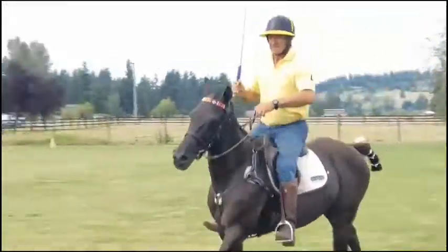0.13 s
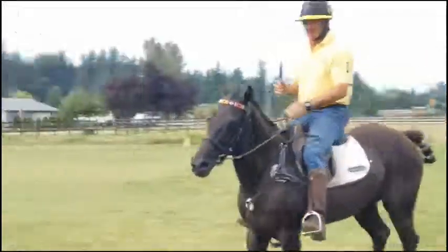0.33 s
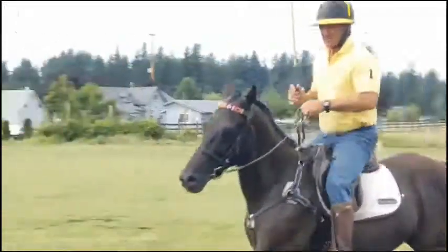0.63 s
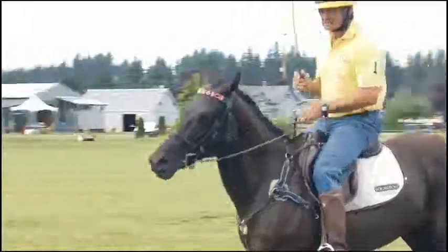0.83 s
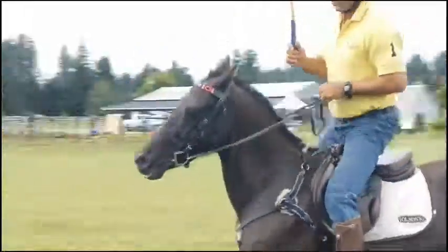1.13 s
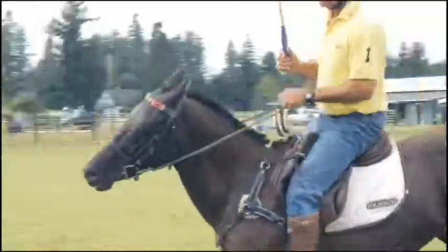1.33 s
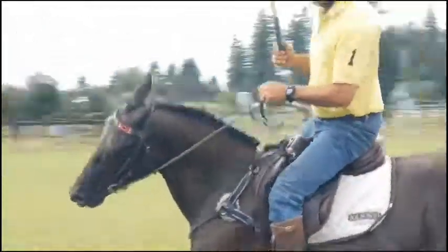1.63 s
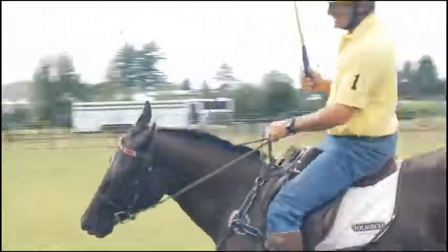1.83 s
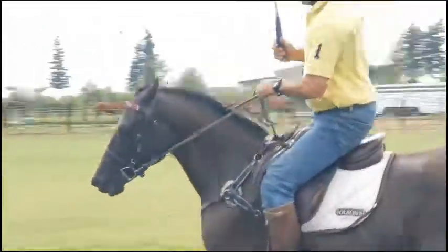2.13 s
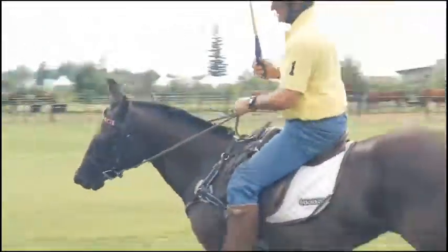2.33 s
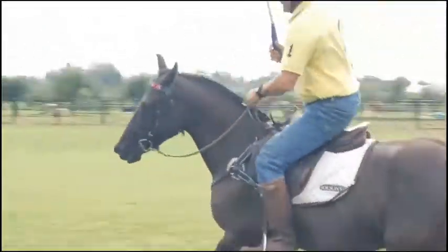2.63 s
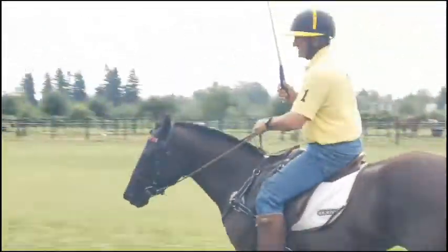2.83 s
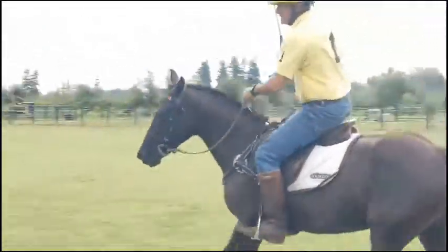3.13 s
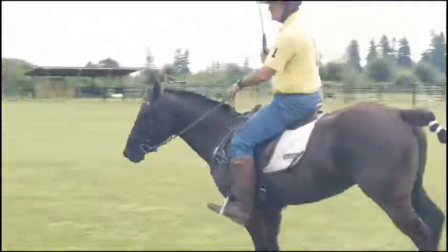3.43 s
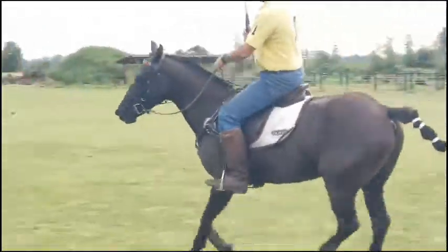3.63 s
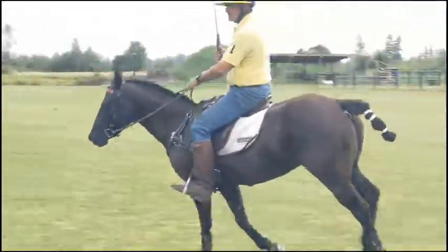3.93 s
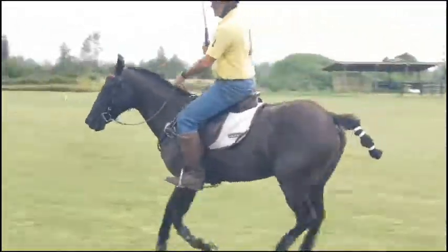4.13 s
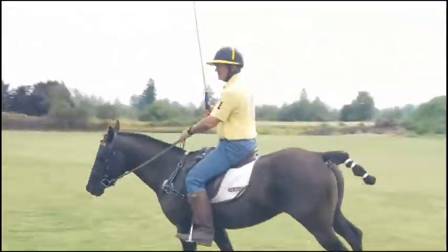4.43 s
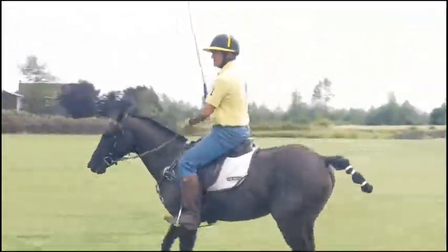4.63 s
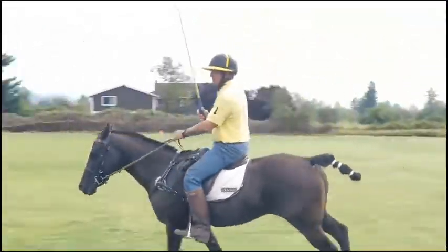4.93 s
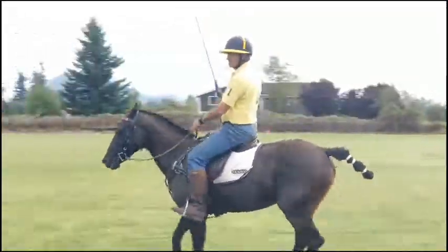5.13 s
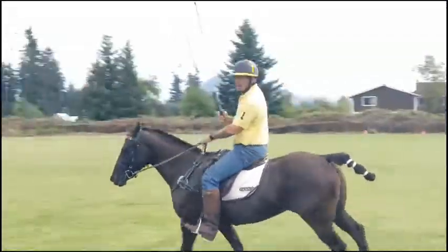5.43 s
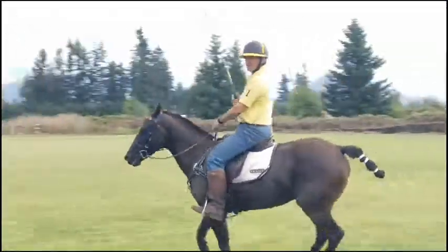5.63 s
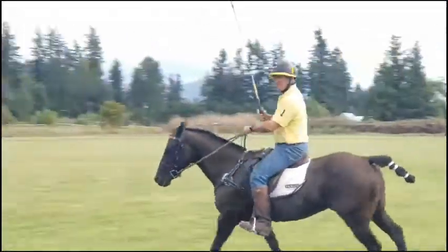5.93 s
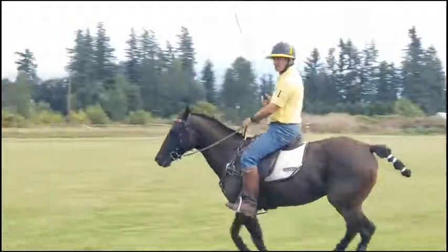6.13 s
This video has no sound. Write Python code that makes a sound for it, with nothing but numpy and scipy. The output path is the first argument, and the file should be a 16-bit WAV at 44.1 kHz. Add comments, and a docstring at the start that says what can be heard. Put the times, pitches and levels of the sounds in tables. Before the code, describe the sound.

In an open grass field, a horse canters past a wind-exposed stereo microphone. From 0 s, soft brushing strokes with dull turf thuds come in quick clusters, one stride about every half second, each with a short, hollow, fluttering nostril blow. The strides are clearest around 0.6-2.3 s. Low wind pops hit the right side from 0.5 s, with a big thump near 1.3 s and smaller buffets on the left until 2.2 s. A tiny bird chirp comes at 1.9 s. From 2.7 to 3.45 s a strong gust pounds the left, with dense booming, slightly saturated knocks. Then it falls away: strides and snorts are weaker and more distant, with crisp ticks near 3.7 and 4.2 s. Smooth far traffic and a faint engine drone drift from left to right. Faint thin whistles come at 5.6-6.05 s as light left-side buffets return until the end at about 6.3 s.

```python
"""Breeze rumbles on a two-port microphone in a grass field as a pony canters past: filtered noise bursts brush
the turf, short noise snaps tick from stalks and tack, and ringing noise makes its blow once a stride.
Wind buffets each port separately, as shaped random kicks and single pulses, with one strong gust on the left.
Far traffic (coloured noise), a small droning engine (summed sines) and a thin bird call (gliding sines)
fill the background."""
import sys
import numpy as np
from scipy import signal
from scipy.fft import irfft
from scipy.io import wavfile
from scipy.ndimage import uniform_filter1d, map_coordinates

SR = 44100
rng = np.random.default_rng(int(sys.argv[2]) if len(sys.argv) > 2 else 0)


def how_loud(loudness_db):
    """Turn decibels into a plain amplitude multiplier (0 dB gives 1, 20 dB gives 10)."""
    steps = np.asarray(loudness_db, float) / 20
    return 10 ** steps


def unload_audio(sound):
    """Save the sound as a 16-bit wav file, at the path given as the first command line argument."""
    columns = np.transpose(np.atleast_2d(sound))
    # keep every value between -1 and 1, then stretch to whole-number steps
    steps = np.round(np.clip(columns, -1, 1) * 32767)
    wavfile.write(sys.argv[1], SR, steps.astype(np.int16))


N = 277830

# the microphone turns, so far sound swings from left to right: time_s, left_lag_samples
MICROPHONE_TURN = [(0, -14.5), (.8, -13), (1.5, -3.5), (2.4, 10), (3.2, 15), (6.3, 16)]
# breeze on the ports: time_s, left_level_db, right_level_db, left_eddy_pitch_hz
PORT_BREEZE = [(0, -43, -43.5, 99), (.4, -45, -40, 104), (.7, -45, -37.5, 133), (.92, -46.5, -34.5, 103),
               (1.25, -36, -32, 124), (1.45, -38, -46.5, 106), (1.8, -48.5, -46.5, 130),
               (1.95, -48, -53, 188), (2.08, -50, -50, 210), (2.16, -40, -41, 105), (2.42, -51, -61, 84.5),
               (2.65, -47, -44, 122), (2.86, -46, -69.5, 134), (3.05, -51, -51, 192),
               (3.55, -40, -48.5, 192), (3.8, -48.5, -64, 212), (4.1, -44.5, -53, 206),
               (4.4, -48.5, -54, 240), (4.7, -58.5, -70, 205), (5.3, -61, -82, 198), (5.6, -47, -52, 94),
               (5.75, -43, -50, 130), (6.0, -42.5, -48.5, 92.6), (6.3, -42, -43, 98.5)]
# relative spectrum of rustling grass: freq_hz, density_db (per Hz)
GRASS_SPECTRUM = [(880, -7.5), (1500, -7), (1670, -4.5), (1830, -8.5), (2310, -3), (2930, -11.5),
                  (3940, -5.5), (5040, -4), (5560, -0.5), (7120, -6.5), (8330, -17.5), (12000, -13),
                  (15800, -15)]


def evened(x):
    """Scales to rms 1."""
    return x / np.sqrt(np.mean(x ** 2) + 1e-20)


def read(points, hz):
    """Reads a spectrum on a log-frequency axis."""
    f, value = np.transpose(points)
    return np.interp(np.log(hz + 1), np.log(f + 1), value)


def curve(rows, column=1, step=1):
    """Reads one column of a table at every step samples, running a little past the end."""
    rows = np.array(rows)
    return np.interp(np.arange(0, N + 1024, step) / SR, rows[:, 0], rows[:, column])


def add(mix, s, sound):
    """Adds a sound at time s, cut off at the end of the mix."""
    part = mix[..., round(s * SR):][..., :sound.shape[-1]]
    part += sound[..., :part.shape[-1]]


def colour(x, gain, size=4096):
    """Filters with no delay by gain(hz)."""
    hz = np.fft.rfftfreq(size, 1 / SR)
    taps = np.roll(irfft(gain(hz)), size // 2, -1) * np.hanning(size)
    filtered = signal.oaconvolve(np.atleast_2d(x), np.atleast_2d(taps), "full", axes=1)
    return filtered[:, size // 2:][:, :x.shape[-1]]


def crackle(per_s, spread_db):
    """Random clicks of either sign, a few much larger than the rest."""
    chance, size, sign = rng.random((N, 3)).T
    heights = how_loud(-spread_db * np.log(size + 0.028))
    return (chance < per_s / SR) * heights * np.sign(sign - .5)


def patchy(x, spread_db, bins, frames):
    """Gives a sound a colour that drifts in random patches of time and pitch."""
    z = signal.stft(x, nperseg=512)[2]
    patches = rng.standard_normal(z.shape[:0:-1]).T
    patches = evened(uniform_filter1d(uniform_filter1d(patches, bins, 0), frames, 1))
    return signal.istft(z * how_loud(spread_db * patches), nperseg=512)[1][:, :N]


def delayed(x, lag):
    """The left port hears x lag samples after the right."""
    return np.array([map_coordinates(x, [np.arange(N) - lag], order=3), x])


def pair(x, alike, lag):
    """Two ports: a shared part that reaches the left lag samples late, and a part of their own."""
    shared = lambda hz: np.sqrt(np.clip(alike(hz), 0, 1))
    own = lambda hz: np.sqrt(1 - shared(hz) ** 2)
    return colour(delayed(x[0], lag), shared) + colour(x[1:], own)


def resonate(x, hz, width):
    """A resonance of gain 1 that follows the curve hz: shift down, low-pass, shift back."""
    turn = np.exp(2j * np.pi * np.cumsum(hz) / SR)
    r = np.exp(-np.pi * width / SR)
    return 2 * (turn * signal.lfilter([1 - r], [1, -r], x / turn)).real


def far_traffic():
    """A smooth roar that slowly fades, with faint drifting patches; its likeness on the ports varies with pitch."""
    # relative spectrum of the roar: freq_hz, density_db (per Hz)
    roar_spectrum = [(18, -6), (30, -13.5), (81, 12), (203, -18.5), (326, -1.5), (551, -4.5), (956, 7),
                     (1150, 3), (1700, 0.5), (2880, -24.5), (4490, -31), (5540, -44.5), (7390, -54.5),
                     (8210, -55), (15800, -36)]
    # loudness of the roar: time_s, level_db
    fade = [(0.0, -53), (3.28, -55.5), (3.56, -56), (6.3, -57)]
    # left-right likeness of the roar: freq_hz, likeness (0 to 1)
    likeness = [(60, 0.26), (500, 1), (1200, 0.6), (2500, 0.076), (5000, .2), (12000, .1)]
    air = patchy(rng.standard_normal((3, N)), 1.0, bins=6, frames=14)
    roar = pair(air, lambda hz: read(likeness, hz), curve(MICROPHONE_TURN)[:N])
    roar = evened(colour(roar, lambda hz: how_loud(read(roar_spectrum, hz))))
    return how_loud(curve(fade)[:N]) * roar


def engine():
    """Low orders of a distant engine, sines on one unsteady rotation; each fades in and out as the air moves."""
    # orders of the drone before the fading: order (multiple of the base pitch), level_db
    orders = [(2, -63.5), (3, -67.5), (4, -68.5), (6, -68.5), (8, -66.5), (10, -68), (12, -71), (14, -77.5)]
    base_hz = 42.85
    # one random drift for each order's level and a last one for the speed
    drift = rng.standard_normal((N // 100 + 1, len(orders) + 1))
    drift = evened(uniform_filter1d(drift, 30, 0))
    drift = uniform_filter1d(drift.repeat(100, 0)[:N], 800, 0).T
    turns = np.cumsum(base_hz * (1 + 0.01128 * drift[-1])) / SR
    hum = np.zeros(N)
    for (order, db), fade in zip(orders, drift):
        level = how_loud(db + 4.5 * np.minimum(fade, 1))
        hum += level * np.sin(2 * np.pi * round(order) * turns)
    return delayed(hum, curve(MICROPHONE_TURN)[:N])


def bird():
    """Thin whistles, sines that glide and waver slightly, stronger on the right."""
    # one list a note, before waver, fading and panning: time_s, pitch_hz, level_db
    notes = [
        [(1.875, 5350, -70), (1.889, 5566, -62), (1.9, 5504, -69)],
        [(5.6, 6850, -74), (5.7, 7170, -71), (5.8, 7110, -69), (5.83, 7050, -72)],
        [(5.985, 6000, -72), (6.01, 6200, -66), (6.05, 5900, -72)],
    ]
    out = np.zeros(N)
    for rows in notes:
        s, hz, db = np.transpose(rows)
        t = np.arange(s[0], s[-1], 1 / SR)
        waver, fade = (evened(uniform_filter1d(v, 300)) for v in rng.standard_normal((2, len(t))))
        pitch_hz = np.interp(t, s, hz) * (1 + .007 * waver)
        tone = np.sin(2 * np.pi * np.cumsum(pitch_hz) / SR)
        level = how_loud(np.interp(t, s, db) + 3 * fade)
        add(out, s[0], level * tone * signal.windows.tukey(len(t), .2))
    return out * how_loud(np.array([[-4], [3]]))  # left, right dB


def wind_level(port):
    """The breeze and every gust on one port add in power; a gust rises fast, holds and dies away."""
    # gusts over the breeze, short surges riding on the long one:
    # start_s, hold_s, level_db, port (0 left, 1 right)
    gusts = [(0.475, 0.02, -24.5, 1), (0.464, .04, -41, 0), (0.556, .03, -40, 0), (0.571, 0.06, -32, 1),
             (1.002, 0.04, -34.5, 0), (1.076, 0.038, -31.5, 0), (1.1, 0.033, -36, 1), (1.173, 0.21, -25, 0),
             (1.273, 0.026, -31, 1), (1.55, 0.14, -42, 0), (1.94, 0.016, -38, 0), (1.988, 0.072, -31.5, 0),
             (2.09, .04, -51, 1), (2.688, 0.75, -23.5, 0), (2.82, 0.14, -18, 0), (3.009, 0.054, -15.5, 0),
             (3.116, 0.028, -18.5, 0), (3.232, 0.024, -16, 0), (3.295, .02, -40, 1), (5.497, 0.023, -46, 0),
             (5.709, 0.089, -36.5, 0), (5.876, 0.022, -35, 0), (6.185, .12, -39, 0)]
    rise_db_per_s, fall_db_per_s = 480, 223
    t = np.arange(N) / SR
    power = how_loud(curve(PORT_BREEZE, column=1 + port)[:N]) ** 2
    for s, hold, db, on in gusts:
        slope_db = rise_db_per_s * np.maximum(s - t, 0) + fall_db_per_s * np.maximum(t - s - hold, 0)
        power = power + (round(on) == port) * how_loud(db - slope_db) ** 2
    return np.sqrt(power)


def wind():
    """Eddies strike each port as pressure kicks; small fast eddies reach higher, and sizes vary by lump."""
    out, hz = [], np.fft.rfftfreq(1024, 1 / SR)[:, None]
    # left then right: corner over eddy pitch, level of the treble tail
    for port, (reach, tail_db) in enumerate([(0.76, -24.5), (0.73, -29.5)]):
        kicks = crackle(260, 2.62) + 0.082 * rng.standard_normal(N)
        z = signal.stft(kicks, nperseg=1024, noverlap=896)[2]
        pitch_hz = curve(PORT_BREEZE, column=3, step=128)[:z.shape[1]] if port == 0 else 85
        lumps = evened(uniform_filter1d(rng.standard_normal(z.shape[1]), 12))
        corner = reach * pitch_hz * how_loud(.7 * lumps)
        shape = np.exp(-hz / corner) + how_loud(tail_db) / (1 + (hz / (2.83 * corner)) ** 2.58)
        shape *= (hz / 72) ** 2.228 / np.sqrt(1 + (hz / 72) ** 4.32)  # the microphone cuts the lowest bass
        shape *= np.minimum(hz / (.45 * pitch_hz), 1) ** 4.4  # small eddies carry little bass
        shape *= how_loud(.9 * lumps) / np.sqrt((shape ** 2).sum(0))  # filter gain set by the lump alone
        eddies = evened(signal.istft(z * shape, nperseg=1024, noverlap=896)[1][:N])
        out.append(wind_level(port) * eddies)
    return np.array(out)


def buffets():
    """Strong wind pulses on single ports, each a sharp suck between two weaker pushes."""
    # single buffets: centre_s, level_db, pitch_hz, port (0 left, 1 right)
    pulses = [(0.487, -19, 119, 1), (0.7044, -22.5, 99, 1), (0.76, -19, 86, 1), (0.833, -22.5, 106, 1),
              (1.038, -14, 94, 1), (1.218, -10.5, 101, 1), (1.235, -14.5, 144, 0), (1.301, -12.5, 112, 0),
              (1.3193, -3, 100, 1), (1.3713, -18, 128, 0), (1.5372, -20, 114, 0), (1.5671, -23, 99, 0),
              (1.643, -21.5, 204, 0), (1.65, -25, 118, 1), (1.954, -26, 189, 0), (1.993, -27, 230, 0),
              (2.067, -29, 260, 0), (2.0378, -20, 167, 0), (2.113, -25.5, 132, 0), (2.147, -25, 77, 0),
              (2.42, -32, 73, 0), (2.686, -11, 118, 0), (2.7748, -8.5, 123, 0), (2.8269, -4.5, 128, 0),
              (2.8706, -9.5, 136, 0), (2.885, -10, 152, 0), (2.962, -9, 111, 0), (2.9071, -3, 137, 0),
              (3.0237, -9, 164, 0), (3.061, -4, 220, 0), (3.148, -14.5, 123.6, 0), (3.2463, -7, 210, 0),
              (3.267, -3, 192, 0), (3.414, -12.5, 210, 0), (4.1692, -36, 226, 0), (4.428, -32.5, 242, 0),
              (5.5, -33, 110, 0), (5.825, -26.5, 131, 0), (5.727, -22.5, 175, 0), (5.7633, -24.5, 120, 0),
              (5.8906, -22, 148, 0), (6.0559, -26, 112, 0), (6.1975, -25, 86.4, 0)]
    out, t = np.zeros((2, N)), np.arange(-1200, 1200) / SR
    for s, db, hz, port in pulses:
        swing = -np.cos(2 * np.pi * hz * t) * np.exp(-(1.89 * hz * t) ** 2)
        kink = -.12 * np.exp(-abs(9 * hz * t))  # the crest is pointed
        add(out[round(port)], s + t[0], how_loud(db) * (swing - swing.mean() + kink))
    return out


def knocks():
    """Hoof on turf or wind slap: a sudden push and a slower pull, rounded at the front."""
    # sharp-fronted knocks: start_s, strength_db, left_over_right_db
    hits = [(1.366, -29, 17), (1.641, -16, 1), (2.736, -24.5, 9), (3.022, -7, 37), (3.126, -26, 26),
            (3.154, -4.5, 40), (3.204, -14.5, 26), (3.246, -23, 26), (3.403, -38, 13.5)]
    out, t = np.zeros((2, N)), np.arange(900) / SR
    push = np.sin(2 * np.pi * 150 * t) * np.exp(-t / 0.0029)
    push += .5 * np.sin(2 * np.pi * 700 * t) * np.exp(-t / 0.00088)
    for s, db, pan_db in hits:
        share = 1 / (1 + how_loud(np.array([[-1], [1]]) * pan_db))
        add(out, s, how_loud(db) * share * push)
    return colour(out, lambda hz: 1 / (1 + (hz / 1300) ** 4), size=512)


def ticks():
    """Stalks and tack snap: a noise burst of a few ms and a weaker rattle after it, bright like the grass."""
    # snaps, before the attack and decay: start_s, level_db
    snaps = [(0.855, -42), (1.01, -41), (1.18, -39), (1.204, -44), (1.6197, -39.5), (1.6407, -46),
             (1.6697, -41), (3.2638, -36.5), (3.697, -47), (3.72, -43), (3.739, -35), (3.915, -50),
             (4.063, -51.5), (4.138, -48.5), (4.21, -44), (4.2367, -44), (4.262, -39.5), (4.5775, -51),
             (4.6531, -46.5), (4.7624, -48), (5.229, -48), (5.4137, -46.5), (5.8198, -44.5), (5.8523, -39),
             (5.9384, -40)]
    out, t = np.zeros((3, N)), np.arange(900) / SR
    decay = how_loud(-60 * t / 0.0092) + 0.3 * how_loud(-60 * t / 0.061)  # each falls at 60 dB per the given seconds
    attack = np.minimum(t / .0025, 1)
    for (s, db), burst in zip(snaps, rng.standard_normal((len(snaps), 3, 900))):
        add(out, s, how_loud(db) * decay * attack * burst)

    def bright(hz):
        high_pass = hz ** 4 / (hz ** 4 + 3500 ** 4)
        return how_loud(read(GRASS_SPECTRUM, hz)) * high_pass / (1 + (hz / 11000) ** 2)

    mean_gain = np.sqrt(np.mean(bright(np.linspace(0, SR / 2, num=512)) ** 2))
    return colour(pair(out, lambda hz: .5 + 0 * hz, lag=0), bright) / mean_gain


def snorts():
    """Air rushes through the nostrils as fluttering noise, and rings in the resonances of the long nose."""
    # one snort a stride: start_s, length_s, level_db, hollow_db (extra on the lowest resonance)
    breaths = [(0.121, 0.22, -57, 1.5), (.62, .2, -51.5, -1), (1.178, 0.27, -52.5, -5),
               (1.679, 0.2, -52, -2), (2.179, 0.2, -55.5, 2.5), (2.696, 0.19, -56, 3.5),
               (3.245, .18, -56.5, 0.5), (3.763, 0.16, -72, 16.5), (4.279, 0.2, -66.5, 12),
               (4.801, 0.21, -63, 6.5), (5.345, .12, -66, 12.5), (5.858, 0.19, -57.5, 4)]
    # resonances of the nose: freq_hz, width_hz (of the two passes together, roughly), level_db
    nose = [(797, 290, 11.5), (1290, 560, 8.5), (2223, 260, 8.5), (3295, 530, 8), (3860, 320, 7.5)]
    ends_db, hollow_fall_db = -4, 6.5  # weaker at both ends; the hollow ring leads and dies first
    out = np.zeros((3, N))
    for s, length, db, hollow_db in breaths:
        t = np.arange(0, length, 1 / SR)
        u = 2 * t / length - 1  # -1 at the start, 1 at the end
        air = rng.standard_normal((5, len(t)))
        flutter = how_loud(0.54 * evened(uniform_filter1d(air[3], 300)))
        force = how_loud(db + ends_db * u ** 2) * signal.windows.tukey(len(t), .6) * flutter
        flare = 1 + 0.015 * evened(uniform_filter1d(air[4], 2500))  # the nostrils shift the resonances
        rings = np.zeros((3, len(nose), len(t)))
        for row, breath in enumerate(air[:3]):
            for k, (f, w, gain_db) in enumerate(nose):
                once = resonate(breath, f * flare, 1.4 * w)
                twice = resonate(once, f * flare, 1.47 * w)
                rings[row, k] = how_loud(gain_db) * twice / np.sqrt(w)
        upper = rings[:, 1:].sum(1)
        hollow = how_loud(hollow_db - hollow_fall_db * u) * rings[:, 0]
        add(out, s, force * (upper + hollow) / upper.std())
    return pair(patchy(out, 0.59, bins=5, frames=5), lambda hz: 0.57 + 0 * hz, lag=0)


def grass():
    """Legs sweep the grass: a dense crackle of stalks under each stroke, with a dull thud of turf along with it."""
    # steady rustle between strokes, fading with distance: time_s, level_db
    brush = [(0, -55), (2.7, -57), (3.5, -63), (4.0, -65), (6.3, -63.5)]
    # four legs in every stride: before_last_leg_s, length_s
    legs = [(0.304, 0.032), (0.214, .035), (0.1015, 0.097), (0, 0.087)]
    # strides: last_leg_s, then level_db of each of the four strokes
    strides = [(0.182, -55, -55, -56.5, -49), (0.704, -52, -50.5, -51, -44.5),
               (1.209, -53.5, -52.5, -49, -50.5), (1.741, -53.5, -62.5, -51.5, -48.5),
               (2.249, -53, -60, -50.5, -50), (2.776, -62, -53, -52.5, -49.5),
               (3.302, -57, -58.5, -56, -52), (3.85, -61.5, -57.5, -57, -53.5),
               (4.362, -67, -66.5, -57.5, -56.5), (4.888, -59.5, -76.5, -60, -56.5),
               (5.431, -58.5, -66, -60.5, -55), (5.941, -68, -60, -57.5, -56), (6.46, -60.5, -64, -62, -62)]
    t, stroke = np.arange(N) / SR, how_loud(curve(brush)[:N])
    for s, *levels in strides:
        for db, (before, length) in zip(levels, legs):
            late = (t - s + before) / length
            fall_db = 18.4 * np.where(late < 0, 1.15, 1) * late ** 2  # quick in, slower out
            stroke = np.maximum(stroke, how_loud(db - fall_db))
    stalks = patchy(np.array([crackle(4500, 3.2) for _ in range(3)]), 1.66, bins=30, frames=5)
    alike = lambda hz: 0.32 / (1 + (hz / 5000) ** 2)
    rustle = evened(colour(pair(stalks, alike, lag=0), lambda hz: how_loud(read(GRASS_SPECTRUM, hz))))
    turf = evened(colour(crackle(43, 3.3), lambda hz: hz / 90 * np.exp(-hz / 110)))
    slow_noise = uniform_filter1d(uniform_filter1d(rng.standard_normal(N), 900), 900)
    flutter = how_loud(1.45 * evened(slow_noise))
    return stroke * (flutter * rustle + how_loud(-7) * turf)


def scene():
    """Airborne sound takes the colour of each port; wind and knocks act on the ports directly."""
    # difference between the ports: freq_hz, left_over_right_db
    port_balance = [(60, -1), (500, -1.5), (1300, 1.5), (2700, 4.5), (5500, 0.5), (7500, 0.5), (9500, -3.5),
                    (11500, -8.5), (13500, 4.5), (15500, 11)]
    air = far_traffic() + engine() + bird() + ticks() + snorts() + grass()
    air = colour(air, lambda hz: how_loud(np.outer([.5, -.5], read(port_balance, hz))), size=1024)
    return air + wind() + buffets() + knocks()


def top_cut(x):
    """Nothing passes above the cut-off."""
    return signal.sosfilt(signal.butter(12, 15960, fs=SR, output="sos"), x)


def record(dry):
    """The input stage saturates softly on the strongest buffets."""
    ceiling = 0.75
    mix = dry / (1 + abs(dry / ceiling) ** 4) ** (1 / 4)
    return top_cut(mix)


dry = scene()
out = record(dry)
unload_audio(out)
```